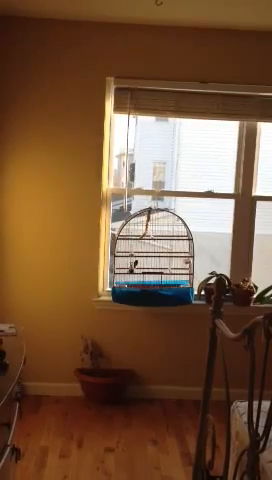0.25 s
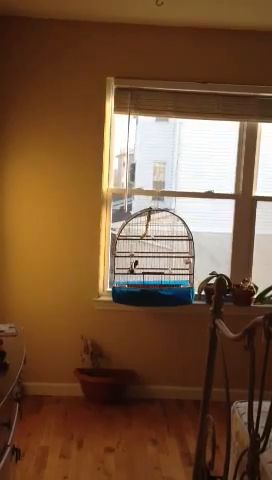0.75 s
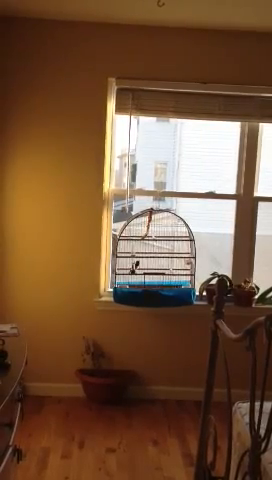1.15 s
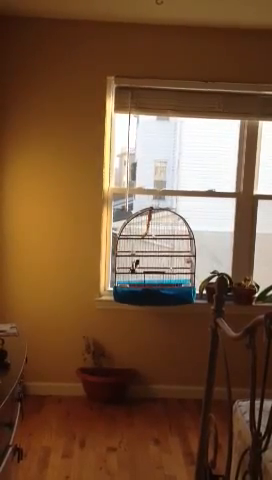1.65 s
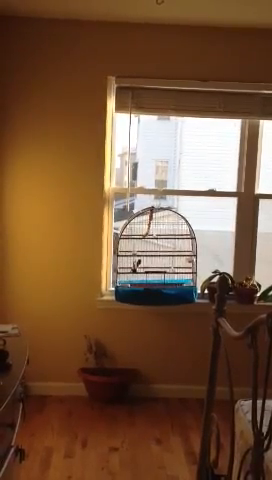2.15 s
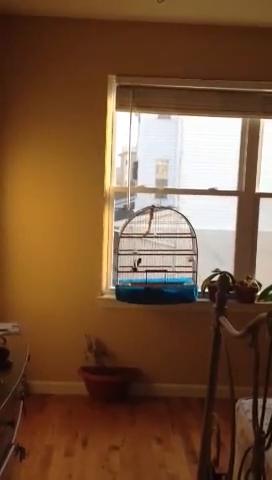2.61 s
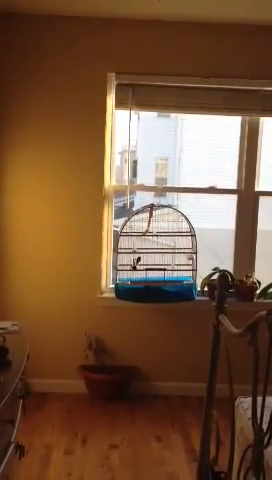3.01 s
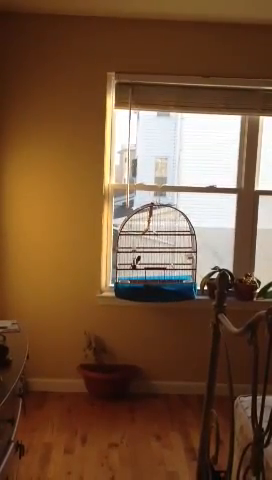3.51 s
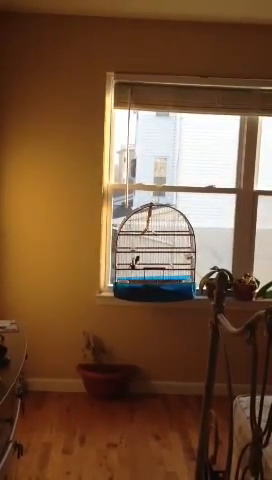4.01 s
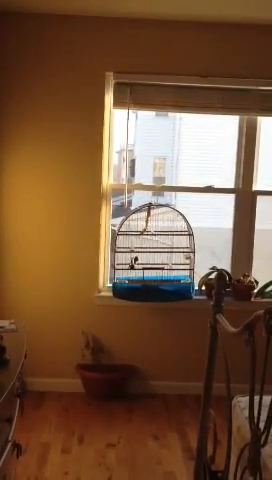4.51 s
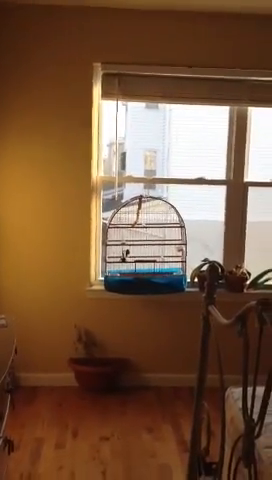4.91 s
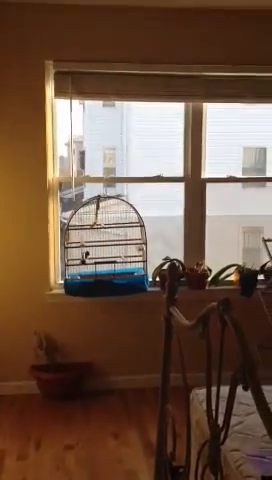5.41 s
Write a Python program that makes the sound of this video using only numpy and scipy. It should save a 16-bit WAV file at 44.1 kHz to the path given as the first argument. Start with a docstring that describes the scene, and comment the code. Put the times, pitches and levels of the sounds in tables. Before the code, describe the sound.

A small caged bird sings one quick phrase of high chirps, slurs, ticks and a dry rattle in a quiet, slightly echoing room.

```python
"""A bare, wooden-floored room; one microphone across from a caged seedeater by the window.
Over a low, steady rush the bird's syrinx opens with a loud slur and a murmur, both sides at once.
Five whip-and-whistle chirps follow, a falling slur, a trill of ticks, a whine and a sharp upward slur.
Faint creaks, a hiss and a sigh lead to a dry rattle and a last rasp. The walls smear every note,
and a few dull bumps sound in the background, during the phrase and after it."""
import sys
import numpy as np
from scipy import signal
from scipy.fft import rfft, irfft, next_fast_len
from scipy.io import wavfile
from scipy.ndimage import map_coordinates

SR = 44100
rng = np.random.default_rng(int(sys.argv[2]) if len(sys.argv) > 2 else 0)


def wav_out(sig):
    """Save sig, one row per channel (or a flat mono array), as 16-bit PCM at SR to the path in sys.argv[1]."""
    wavfile.write(sys.argv[1], SR, np.round(np.clip(np.atleast_2d(sig).T, -1, 1) * 32767).astype(np.int16))


N = 249253
TOP_HZ = 15500

# Room rush: (frequency [Hz], level [dB])
RUSH_COLOUR = [(25, -42), (60, -22.5), (110, -16), (160, -7.5), (260, -3.5), (325, -6.5), (400, -4),
               (1100, -6), (1500, -8), (3000, -8.5), (4300, -16.5), (7500, -11.5), (10000, -19.5),
               (15500, -20)]
# Room resonances: (frequency [Hz], width [Hz], level [dB])
ROOM_MODES = [(162.6, 10, -3.5), (203.5, 21, -2.5), (257.5, 18, 0.5), (498, 2.6, 2.5), (660, 12, -6),
              (974, 69, -8.5)]
# Decay of the room's tail: (frequency [Hz], time to fall 60 dB [s])
ROOM_DECAY = [(1000, 0.13), (3000, 0.56), (6000, 0.4), (9000, 0.34), (15000, .3)]

# Note shapes: glide (half_s [s], steep [exponent]), swell (swell_db [dB], peak_s, rise_s, fall_s [s]),
# roughness (from hoarse, if given, to rough [factors] around clear_s [s]), fades (edge_s [s])
OPENING = dict(half_s=.05, steep=2, swell_db=9.5, peak_s=0.013, rise_s=0.057, fall_s=0.039, rough=0.21)
MURMUR = dict(half_s=0.12, steep=6.7, swell_db=20.5, peak_s=0.017, rise_s=0.061, fall_s=0.19, rough=0.19, hoarse=1.0, clear_s=0.019)
WHIP = dict(half_s=0.018, steep=2.54, swell_db=31.5, peak_s=0.0072, rise_s=0.0055, fall_s=0.018, rough=0.18)
WHISTLE = dict(half_s=.028, steep=3.03, swell_db=8.5, peak_s=0.037, rise_s=0.018, fall_s=0.067, rough=0.3, edge_s=.007)
FALL = dict(half_s=.073, steep=6, swell_db=5, peak_s=0.051, rise_s=0.028, fall_s=0.029, rough=0.069, hoarse=0.72, clear_s=0.098, edge_s=0.015)
TICK = dict(half_s=0.0247, steep=1.297, swell_db=14.5, peak_s=0.0094, rise_s=0.0051, fall_s=0.0071, rough=0.72)
HOOK = dict(half_s=.011, steep=1.33, swell_db=12.5, peak_s=0.0076, rise_s=0.0052, fall_s=0.0078, rough=0.087)
WHINE = dict(half_s=.07, steep=2, swell_db=5.5, peak_s=0.066, rise_s=0.021, fall_s=0.23, rough=0.14, hoarse=.95, clear_s=0.0616)
RISE = dict(half_s=0.0201, steep=1.3, swell_db=22.5, peak_s=0.019, rise_s=0.015, fall_s=0.029, rough=0.048, hoarse=.7, clear_s=0.02)
SIGH = dict(half_s=.062, steep=1.15, swell_db=13, peak_s=0.076, rise_s=0.018, fall_s=0.092, rough=0.16, hoarse=0.73, clear_s=0.047, edge_s=.002)
AFTERNOTE = dict(half_s=0.063, steep=1.92, swell_db=12.5, peak_s=0.06, rise_s=0.08, fall_s=0.061, rough=0.24)
RASP = dict(half_s=0.0625, steep=6.2, swell_db=9.5, peak_s=0.033, rise_s=0.027, fall_s=0.047, rough=.3, edge_s=0.013)

# Two-voiced notes (opening, murmur, whine, rasp):
# (time [s], length [s], low voice start [Hz], low voice end [Hz], level [dB], high over low [ratio])
DUETS = [(0, 0.078, 4864, 4166, -7.5, 1.43), (0.166, 0.212, 1378, 1325, -36.5, 1.444),
         (2.211, 0.29, 2955, 2244, -35, 1.45), (4.074, 0.083, 1499, 1456, -25.5, 1.38)]
# Chirps: (time [s], whip top [Hz], whip end [Hz], whip level [dB],
# whistle length [s], whistle end [Hz], whistle level [dB])
CHIRPS = [(0.441, 6090, 4430, -10.5, 0.14, 2896, -22.5), (.720, 5900, 4190, -11, 0.13, 2843, -23),
          (0.979, 6280, 4600, -8.5, 0.084, 2816, -23.5), (1.123, 6300, 4420, -8.5, 0.0895, 2815, -24),
          (1.263, 6440, 4500, -9.5, 0.074, 2740, -25.5)]
# Background bumps: (time [s], level [dB], pitch [Hz])
BUMPS = [(1.02, -45, 690), (2.09, -44.5, 725), (2.291, -48, 900), (4.76, -49, 1090), (5.04, -46.5, 690)]
# Slurs (fall, rise, sigh, afternote): (time [s], length [s], start [Hz], end [Hz], level [dB])
SLURS = [(1.502, 0.17, 4497, 3254, -12.5), (2.504, 0.035, 5760, 8050, -3), (2.957, 0.205, 3070, 1829, -22),
         (3.19, 0.148, 1761, 1645, -34)]
# Ticks: (time [s], level [dB], hook level [dB])
TICKS = [(1.691, -24.5, -28), (1.792, -24, -24.5), (1.888, -22, -22), (1.986, -23.5, -21),
         (2.084, -23.5, -21)]
# Hiss through the bill: (time [s], length [s], level [dB])
HISS = (2.69, 0.19, -40.5)
# Creaks: (time [s], length [s], pitch [Hz], level [dB], roughness [factor])
CREAKS = [(2.698, 0.17, 1128, -48, 0.41), (3.409, 0.6, 1112, -49, 0.77), (4.271, 0.081, 897, -50, 1.07)]
# Rattle strokes: (time [s], level [dB])
RATTLE_STROKES = [(3.48, -31.5), (3.54, -28.5), (3.602, -28.5), (3.664, -28.5), (3.726, -28),
                  (3.791, -28.5), (3.851, -28), (3.918, -30)]

# Partials of both sides together: (low voice [multiple], high voice [multiple], level [dB])
OPENING_MIX = [(1, 0, -24), (0, 1, -2.5), (2, 0, -28), (1, 1, -19.5), (0, 2, -23.5)]
MURMUR_MIX = [(1, 0, -14), (0, 1, -3), (2, 0, 0.5), (1, 1, -12), (0, 2, -22), (3, 0, -25)]
WHINE_MIX = [(1, 0, -6), (0, 1, -10), (2, 0, -5), (1, 1, -5), (3, 0, -4), (0, 2, -4), (2, 1, -13),
             (4, 0, -18), (3, 1, -20), (6, 0, -18)]
RASP_MIX = [(1, 0, -25), (0, 1, -21), (2, 0, -11.5), (0, 2, -17.5), (3, 0, -19.5), (4, 0, -16),
            (0, 3, -14.5), (2, 2, -6), (5, 0, -2), (6, 0, -9), (7, 0, -10), (8, 0, -14)]
# Harmonics of one side alone: (pitch [multiple], level [dB])
WHIP_TONE = [(1, -3), (2, -23), (3, -20.5)]
WHISTLE_TONE = [(1, 0.5), (2, -19), (3, -28), (4, -33), (5, -24.5)]
FALL_TONE = [(1, -7.5), (2, -26), (3, -20.5)]
TICK_TONE = [(1, 1.5), (2, -45), (3, -40)]
THIN_TONE = [(1, -4.5), (2, -29)]
CREAK_TONE = [(1, -2), (2, -3), (3, -10.5)]
SIGH_TONE = [(1, -17), (2, -3), (3, -16.5), (4, -21), (5, -25.5), (6, -24), (7, -28)]
# Noise of air through the syrinx, and of the rattle's bursts: (frequency [Hz], level [dB])
TURBULENCE = [(1000, -54), (3000, -6), (5500, 16.5), (7500, 17.5), (10000, 7.5), (13000, 14.5), (15500, -3)]
WHINE_AIR = [(1500, -40), (3200, -22), (5000, 0), (5900, 6), (7500, -13), (10000, -7), (15500, -19)]
RASP_AIR = [(1180, -46), (2000, -14.5), (2610, -16), (2940, -15), (3260, -15), (4360, -17), (5400, -9),
            (7360, -6), (7950, 3.5), (11600, -0.5), (15500, -12)]
RATTLE_COLOUR = [(1060, -32), (1800, -19), (2210, -11.5), (2470, -16.5), (3090, -8.5), (3770, -16),
                 (4430, -13), (4890, -19.5), (7340, -4.5), (8030, -5), (11800, -19.5), (14400, -16),
                 (15500, -24)]
# Resonance of the bill: (frequency [Hz], level [dB])
HALF_SHUT_BILL = [(2300, -4), (3600, -3.5), (4700, -4), (5900, 0), (7200, -2), (8800, -7), (14000, -2.5)]
OPEN_BILL = [(1500, -70), (4500, -27), (6200, -18.5), (7300, -7), (8000, -10), (9500, -22.5),
             (13000, -28.5)]


def amp(db):
    """Decibels to gain."""
    return 10 ** (np.asarray(db) / 20)


def unit(x):
    """Scale to rms 1."""
    return x / np.sqrt(np.mean(x ** 2) + 1e-20)


def along(points, hz):
    """Read (Hz, value) points on a log axis."""
    f, v = np.transpose(points)
    return np.interp(np.log(hz + 1), np.log(f + 1), v)


def wobble(n, rate):
    """A smooth random curve of n samples, rate knots a second."""
    return map_coordinates(rng.standard_normal(int(n * rate / SR) + 4), [np.arange(n) * rate / SR])


def filtered(x, response):
    """Shape x by a gain that depends on frequency."""
    m = next_fast_len(len(x) + 8192)
    return irfft(rfft(x, m) * response(np.fft.rfftfreq(m, 1 / SR)), m)[:len(x)]


def noise(n, colour):
    """Coloured noise of rms 1, rolled off below the first point of its colour."""
    low_hz = colour[0][0]
    response = lambda hz: amp(along(colour, hz)) * np.minimum(hz / low_hz, 1) ** 2
    return unit(filtered(rng.standard_normal(n), response))


def add(out, s, sound):
    """Lay a sound in at time s, with 2 ms soft edges."""
    index = np.arange(len(sound))
    edge = np.minimum(index, index[::-1]) / (.002 * SR)
    part = out[max(round(s * SR), 0):][:len(sound)]
    part += (sound * np.minimum(edge, 1))[:len(part)]


def swell(t, swell_db, peak_s, rise_s, fall_s):
    """One push of effort: dB below its peak, from and back toward a level swell_db lower."""
    width_s = np.where(t < peak_s, rise_s, fall_s)
    return swell_db * (np.exp(-((t - peak_s) / width_s) ** 2) - 1)


def gesture(length_s, start_hz, end_hz, peak_db, half_s, steep, swell_db, peak_s, rise_s, fall_s,
            rough, hoarse=None, clear_s=None, edge_s=None):
    """Pitch, level and roughness of a note: an S-shaped glide, a swell, any hoarse start clearing."""
    t = np.arange(1, round(length_s * SR)) / SR
    glide = 1 - 1 / (1 + (t / half_s) ** steep)
    hz = start_hz + (end_hz - start_hz) * glide / glide[-1]
    db = peak_db + swell(t, swell_db, peak_s, rise_s, fall_s)
    if edge_s:
        db = db + 20 * np.log10(np.minimum(np.minimum(t, t[::-1]) / edge_s, 1))
    if hoarse:
        rough = rough + (hoarse - rough) / (1 + (t / clear_s) ** 8)
    return hz, db, rough


def syrinx(hz, rough, jitter=0.071, flutter_rate=1300):
    """Phase of one vibrating side; roughness makes its pitch flutter."""
    return 2 * np.pi * np.cumsum(hz * (1 + jitter * rough * wobble(len(hz), flutter_rate))) / SR


def duet(voices, shape, mix, air_colour, air_db):
    """Both sides sound together and modulate each other, giving sum tones over rushing air."""
    *low_voice, interval = voices
    low_hz, db, rough = gesture(*low_voice, **shape)
    low, high = syrinx(low_hz, rough), syrinx(interval * low_hz, rough)
    tone = sum(amp(level) * np.sin(j * low + k * high) for j, k, level in mix)
    leak = amp(air_db) * np.sqrt(abs(rough)) * noise(len(db), air_colour)
    return amp(db) * (np.sqrt(2) * tone + leak)


def note(path, harmonics, air_db=-28, warble=0, warble_hz=310, jitter=0.062, brightening=.35):
    """One side of the syrinx follows a pitch and level path; rough notes leak turbulent air."""
    hz, db, rough = path
    n = len(hz)
    # A very fast warble puts side tones around the pitch.
    flutter = np.sin(2 * np.pi * np.cumsum(warble_hz * (1 + 0.199 * wobble(n, 80.7))) / SR)
    phase = syrinx(hz * (1 + warble * rough * flutter), rough, jitter)
    # Harmonics above the strongest one fade faster than it as the effort drops.
    strongest = max(harmonics, key=lambda row: row[1])[0]
    dull_db = brightening * (db - db.max())
    tone = sum(amp(level + dull_db * (k > strongest)) * np.sin(k * phase) * (k * hz < SR / 2)
               for k, level in harmonics)
    leak = amp(air_db) * rough * noise(n, TURBULENCE)
    shimmer_db = 3 * rough * wobble(n, 600)
    return amp(db + shimmer_db) * (np.sqrt(2) * tone + leak)


def room_rush(rush_db=-46.5, hum_db=-55, drift_db=0.9):
    """Room tone under everything: a steady rush, humming faintly in the room's resonances."""
    def modes(f):
        return sum(amp(db) * 1j * f * width / (hz * hz - f * f + 1j * f * width)
                   for hz, width, db in ROOM_MODES)
    hum = unit(filtered(noise(N, RUSH_COLOUR), modes))
    drift = amp(drift_db * wobble(N, 4.52))
    return drift * (amp(rush_db) * noise(N, RUSH_COLOUR) + amp(hum_db) * hum)


def opening(out):
    """The loud first slur: both voices slide down together, the high one louder."""
    s, *voices = DUETS[0]
    add(out, s, duet(voices, OPENING, OPENING_MIX, TURBULENCE, air_db=-14))


def murmur(out):
    """Both sides hold a soft, low, nasal note."""
    s, *voices = DUETS[1]
    add(out, s, duet(voices, MURMUR, MURMUR_MIX, TURBULENCE, air_db=-8))


def chirps(out, whip_s=0.0208, answer_s=.029, start_share=.73):
    """One side whips steeply down, then the other answers with a low, warbling, rising whistle."""
    for s, top_hz, end_hz, whip_db, whistle_s, whistle_hz, whistle_db in CHIRPS:
        whip = gesture(whip_s, top_hz, end_hz, whip_db, **WHIP)
        whistle = gesture(whistle_s, start_share * whistle_hz, whistle_hz, whistle_db, **WHISTLE)
        add(out, s, note(whip, WHIP_TONE, air_db=-52))
        add(out, s + answer_s, note(whistle, WHISTLE_TONE, air_db=-28, warble=0.092))


def bumps(t60_s=1.0, attack_s=0.0093, skirt_db=-42):
    """Soft, dull bumps in the background, each a narrow band of noise dying away."""
    out, t = np.zeros(N), np.arange(SR // 2) / SR
    for s, db, hz in BUMPS:
        body = noise(len(t), [(hz / 2, skirt_db), (hz, 0), (hz * 2, skirt_db)])
        add(out, s, amp(db - 60 * t / t60_s) * (1 - np.exp(-t / attack_s)) * body)
    return out


def slurs(out):
    """One side glides: a fall, a quick rise, a sigh, its afternote. The throat favours one harmonic."""
    (fall_s, *fall), (rise_s, *rise), (sigh_s, *sigh), (after_s, *after) = SLURS
    add(out, fall_s, note(gesture(*fall, **FALL), FALL_TONE, air_db=-39,
                          warble=0.096, warble_hz=416, jitter=0.051, brightening=1.0))
    add(out, rise_s, note(gesture(*rise, **RISE), THIN_TONE, air_db=-31, jitter=0.041))
    add(out, sigh_s, note(gesture(*sigh, **SIGH), SIGH_TONE, air_db=-11, jitter=0.077, brightening=0.2))
    add(out, after_s, note(gesture(*after, **AFTERNOTE), SIGH_TONE[:2], air_db=-10))


def ticks(out, hook_delay_s=0.018):
    """A trill of short hoarse notes, each dropping into a clean hook, an octave in all."""
    for s, db, hook_db in TICKS:
        tick = gesture(length_s=0.0195, start_hz=6100, end_hz=4250, peak_db=db, **TICK)
        hook = gesture(length_s=0.0164, start_hz=3700, end_hz=2950, peak_db=hook_db, **HOOK)
        add(out, s, note(tick, TICK_TONE, air_db=-5.5))
        add(out, s + hook_delay_s, note(hook, THIN_TONE))


def whine(out):
    """A soft, hoarse, two-voiced note sinks behind a half-shut bill."""
    s, *voices = DUETS[2]
    source = duet(voices, WHINE, WHINE_MIX, WHINE_AIR, air_db=3)
    add(out, s, filtered(source, lambda hz: amp(along(HALF_SHUT_BILL, hz))))


def hiss(out):
    """A thin breath through the open bill."""
    s, length_s, db = HISS
    t = np.arange(round(length_s * SR)) / SR
    breath_db = swell(t, swell_db=13, peak_s=0.073, rise_s=0.1, fall_s=0.18)
    add(out, s, amp(db + breath_db) * noise(len(t), OPEN_BILL))


def creaks(out, sag_db=4):
    """Barely voiced, rough notes that sag in level."""
    for s, length_s, hz, db, rough in CREAKS:
        n = round(length_s * SR)
        path = np.full(n, hz), db - np.linspace(0, sag_db, n), rough
        add(out, s, note(path, CREAK_TONE, air_db=-4.5, jitter=0.1275))


def rattle(out, burst_s=0.013, hiss_s=0.039, hiss_db=-4, grain_db=4):
    """Each stroke is a broad crackling burst that narrows to the bill's resonance."""
    n = round(burst_s * SR)
    for s, db in RATTLE_STROKES:
        burst = unit(noise(n, RATTLE_COLOUR) * amp(grain_db * wobble(n, 880)))
        add(out, s, amp(db) * burst)
        add(out, s, amp(db + hiss_db) * noise(round(hiss_s * SR), OPEN_BILL))


def rasp(out):
    """A harsh last note: both voices pushed hard in turbulent air."""
    s, *voices = DUETS[3]
    add(out, s, duet(voices, RASP, RASP_MIX, RASP_AIR, air_db=5.5))


def room(song, tail_db=-1.0, near_db=-7, first_echo_s=.002, echoes=10):
    """Cage to microphone: direct sound, early echoes and a tail that lasts longest near 3 kHz."""
    hz, t, spectrum = signal.stft(rng.standard_normal(SR), SR, nperseg=256)
    decay = amp(-60 * t / along(ROOM_DECAY, hz)[:, None])
    tail = signal.istft(spectrum * decay, SR, nperseg=256)[1]
    tail[:round(first_echo_s * SR)] = 0
    response = amp(tail_db) * tail / np.linalg.norm(tail)
    response[0] += amp(-5)  # direct
    response[round(.006 * SR)] += amp(-7)  # off the floor
    response[round(.033 * SR)] += amp(-11)  # off the far wall
    near = (rng.uniform(first_echo_s, .028, echoes) * SR).astype(int)  # off things nearby
    response[near] += amp(near_db) * rng.choice([-1, 1], echoes) / np.sqrt(echoes)
    return signal.fftconvolve(song, response)[:N]


def scene():
    """The bird from across the room, in mono, over the room tone."""
    song = np.zeros(N)
    for sing in (opening, murmur, chirps, slurs, ticks, whine, hiss, creaks, rattle, rasp):
        sing(song)
    return (room(song) + bumps() + room_rush())[None]


def record(dry):
    """The recorder keeps nothing above its band limit."""
    return filtered(dry[0], lambda hz: hz < TOP_HZ)[None]


dry = scene()
out = record(dry)
wav_out(out)
```